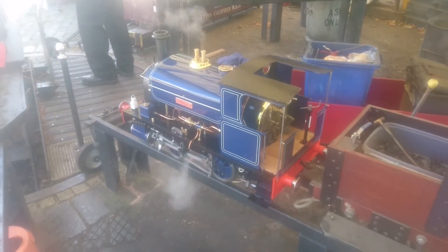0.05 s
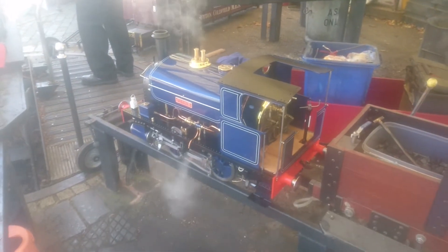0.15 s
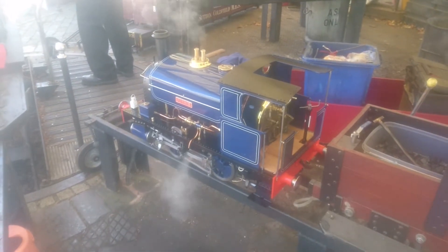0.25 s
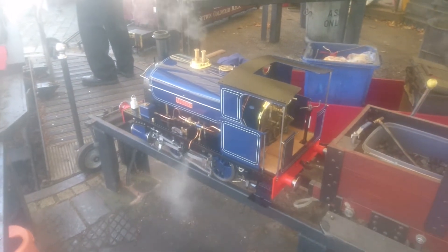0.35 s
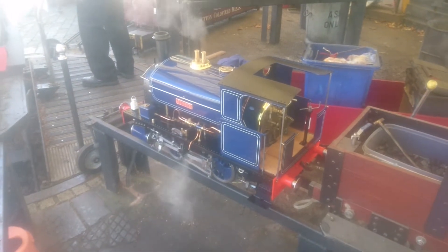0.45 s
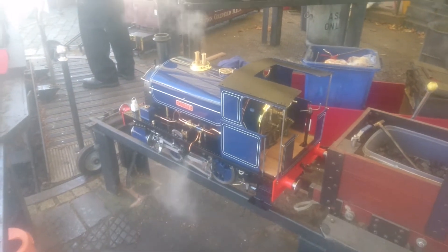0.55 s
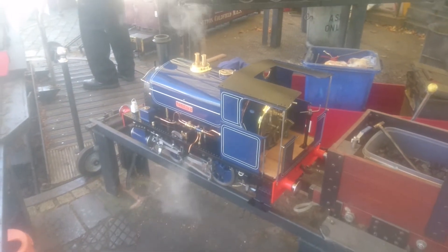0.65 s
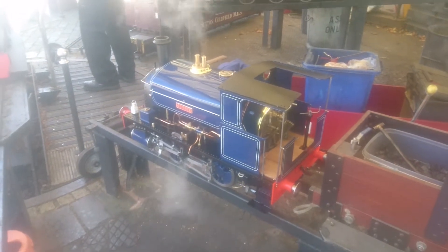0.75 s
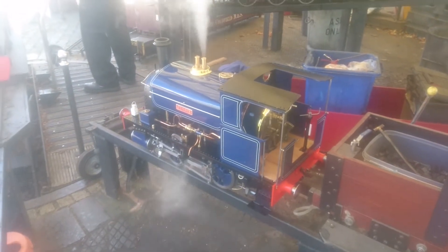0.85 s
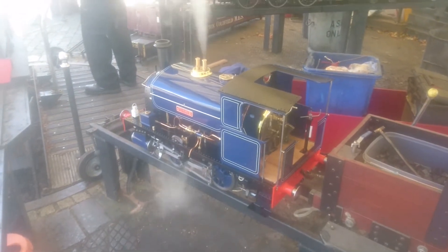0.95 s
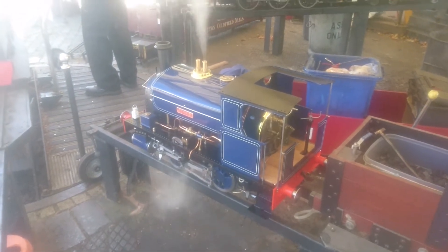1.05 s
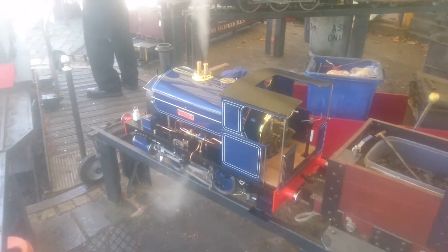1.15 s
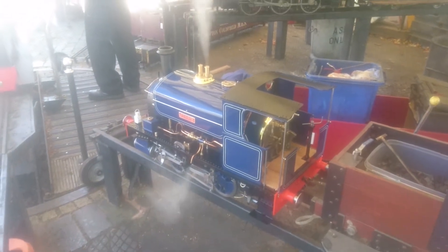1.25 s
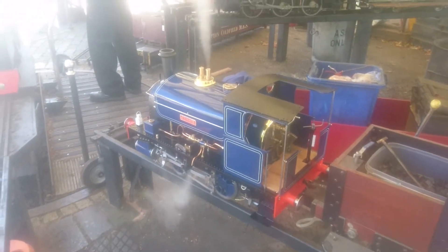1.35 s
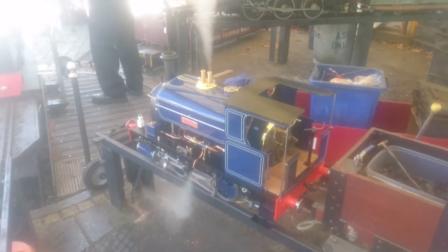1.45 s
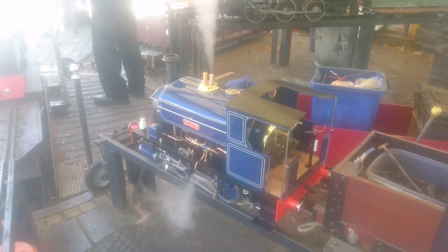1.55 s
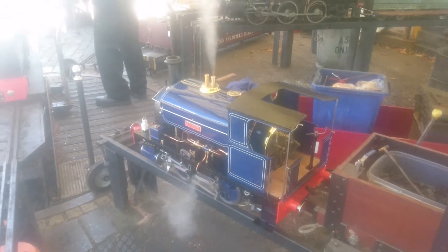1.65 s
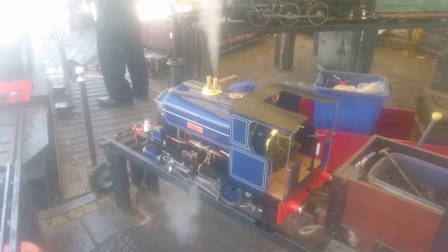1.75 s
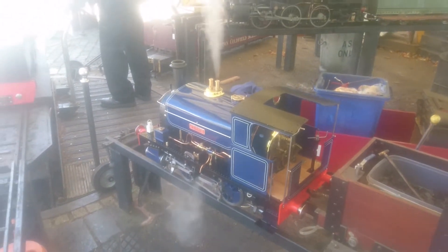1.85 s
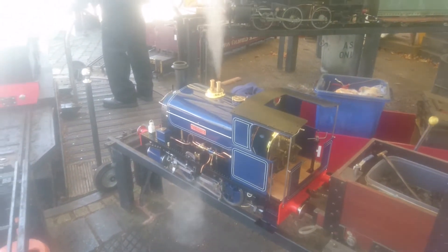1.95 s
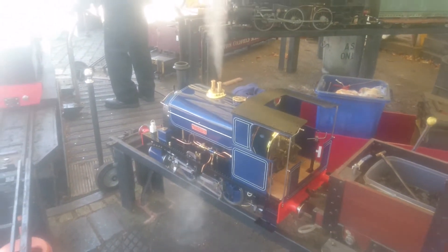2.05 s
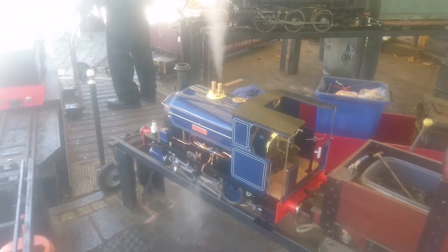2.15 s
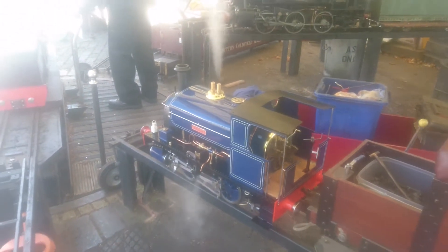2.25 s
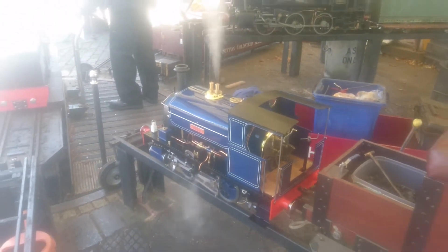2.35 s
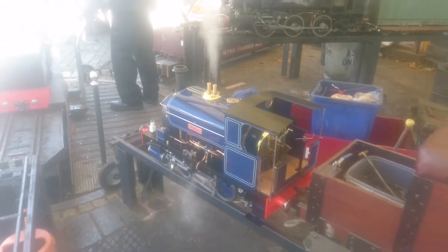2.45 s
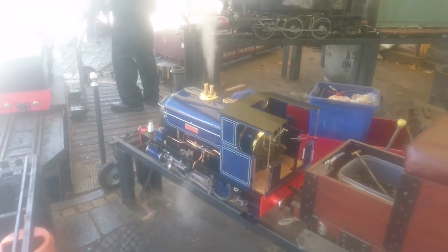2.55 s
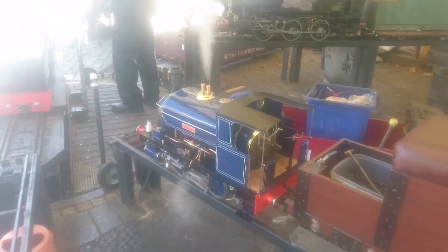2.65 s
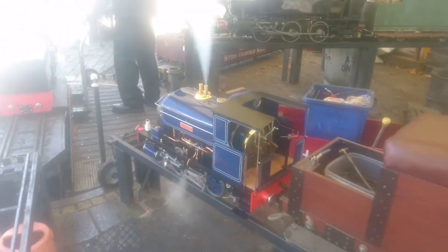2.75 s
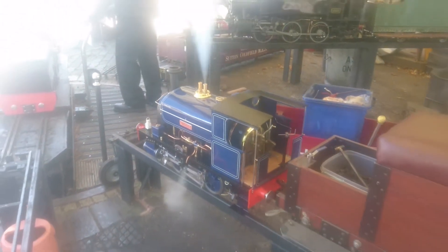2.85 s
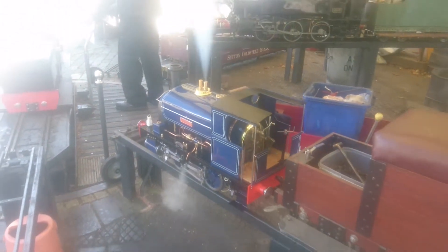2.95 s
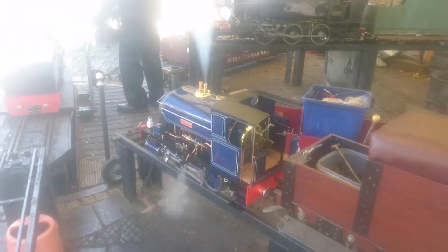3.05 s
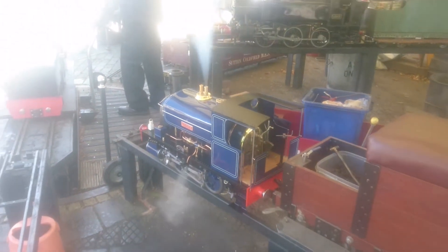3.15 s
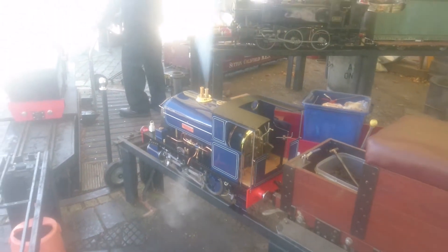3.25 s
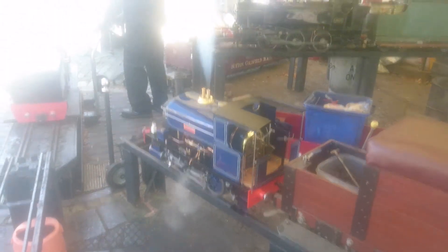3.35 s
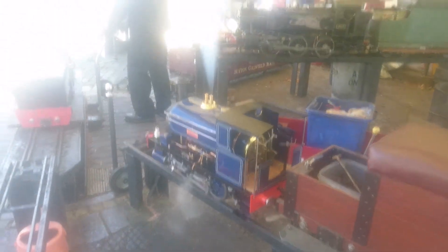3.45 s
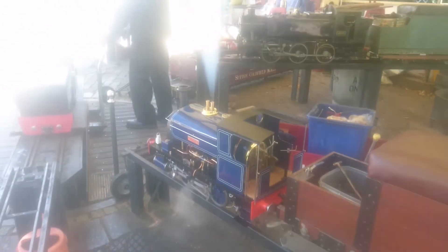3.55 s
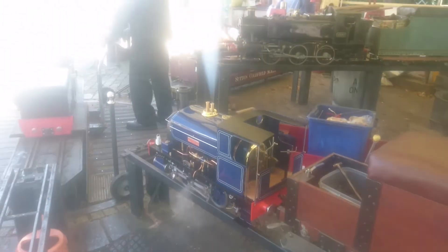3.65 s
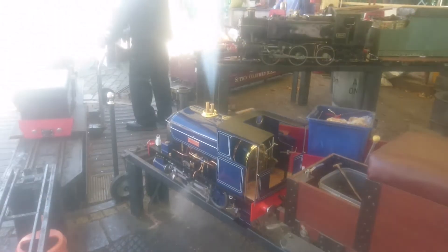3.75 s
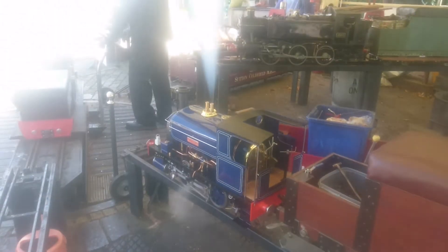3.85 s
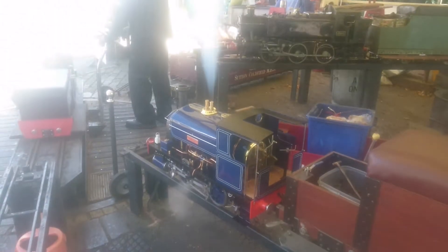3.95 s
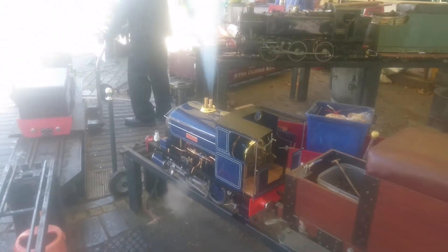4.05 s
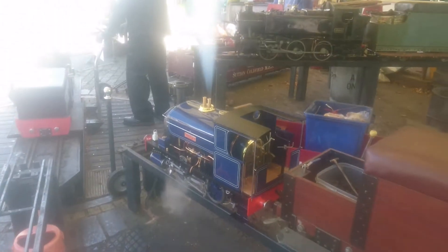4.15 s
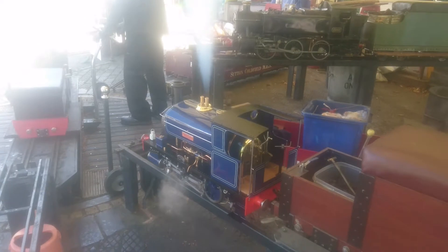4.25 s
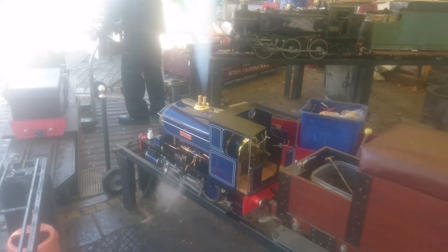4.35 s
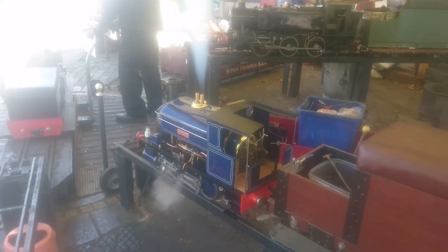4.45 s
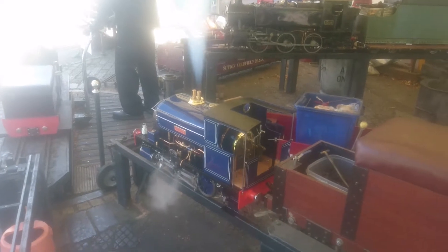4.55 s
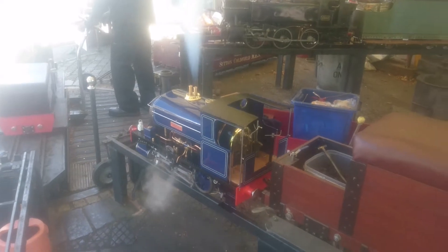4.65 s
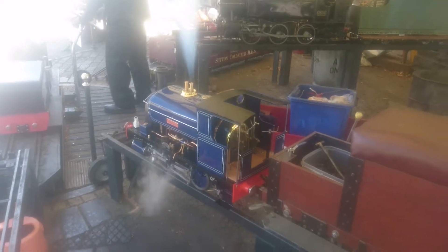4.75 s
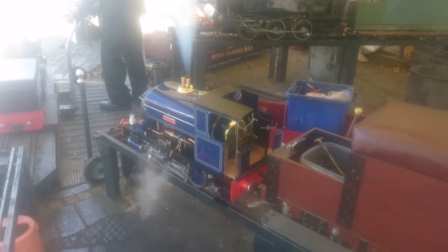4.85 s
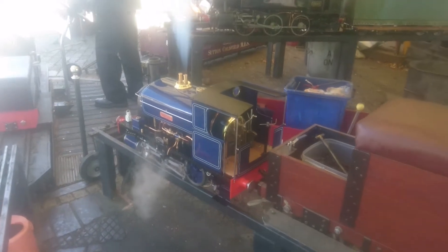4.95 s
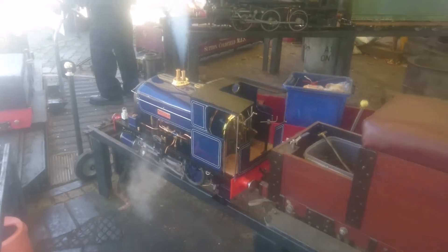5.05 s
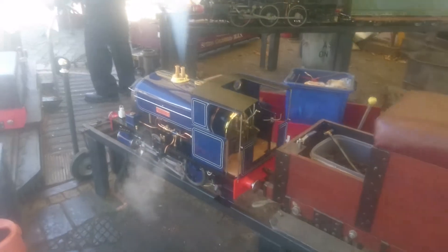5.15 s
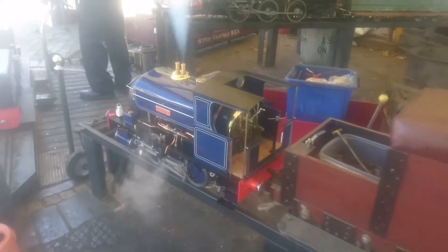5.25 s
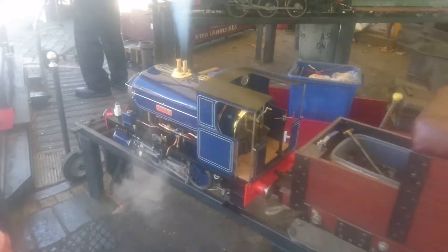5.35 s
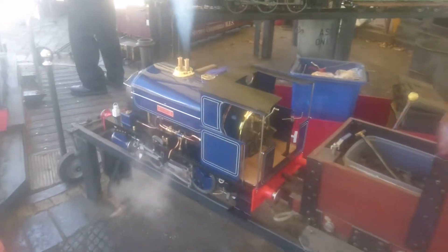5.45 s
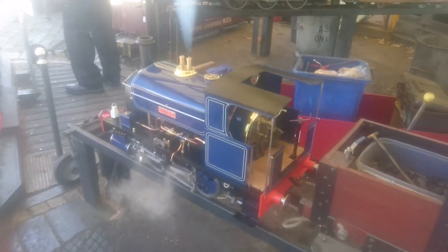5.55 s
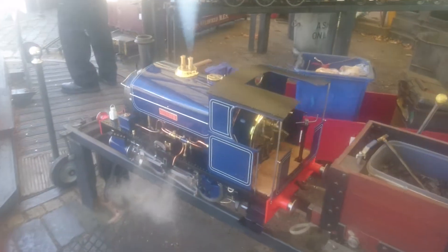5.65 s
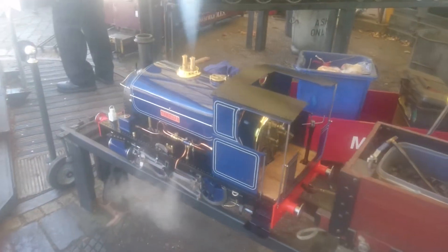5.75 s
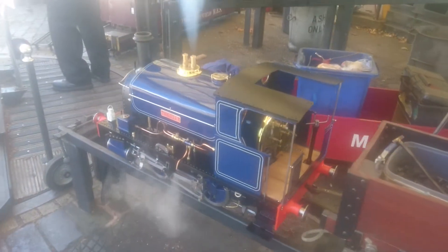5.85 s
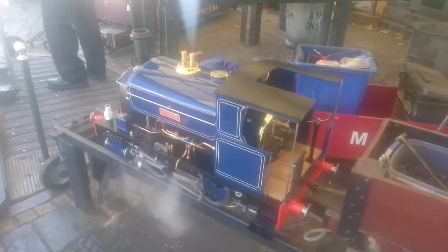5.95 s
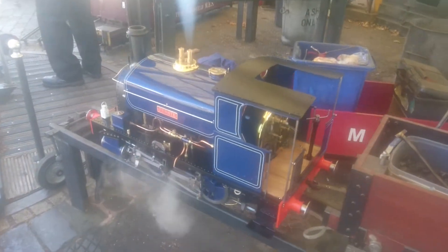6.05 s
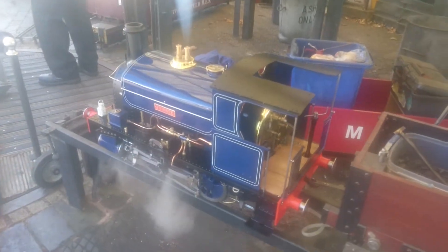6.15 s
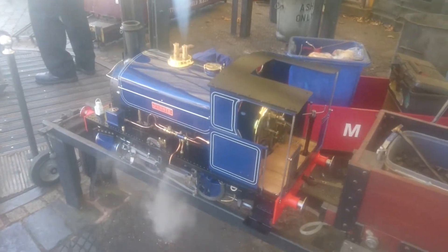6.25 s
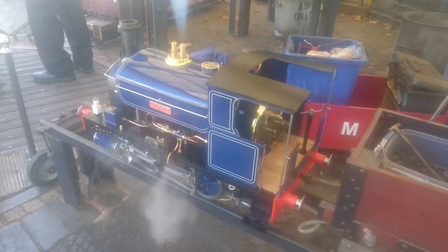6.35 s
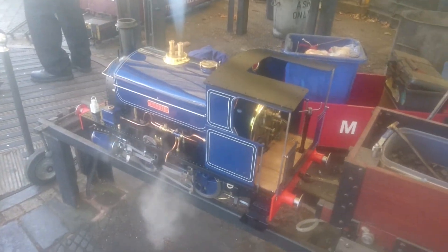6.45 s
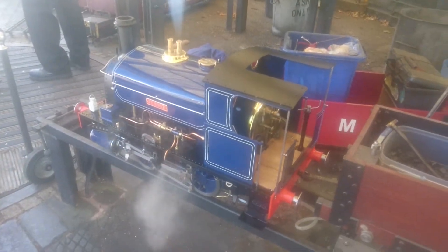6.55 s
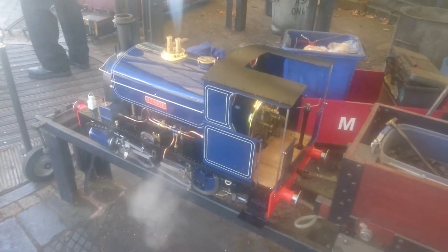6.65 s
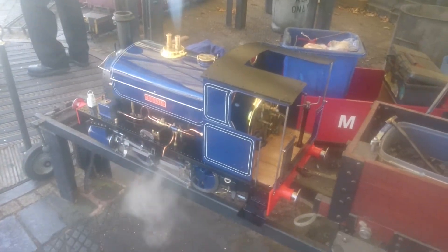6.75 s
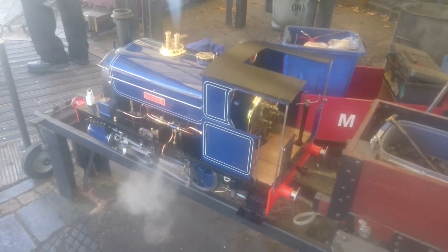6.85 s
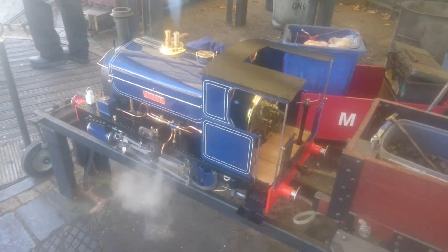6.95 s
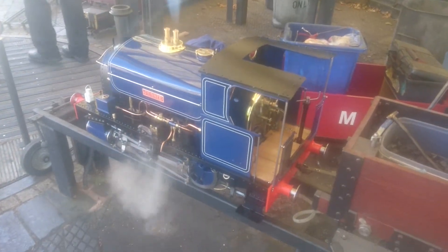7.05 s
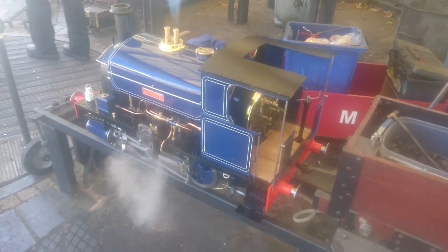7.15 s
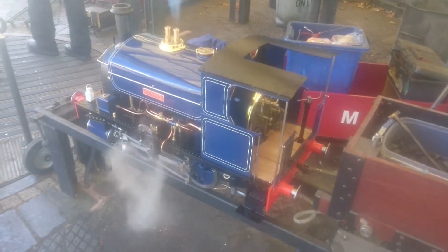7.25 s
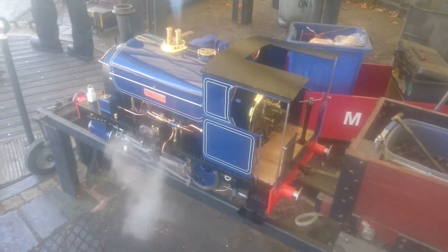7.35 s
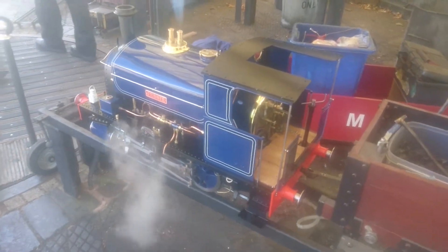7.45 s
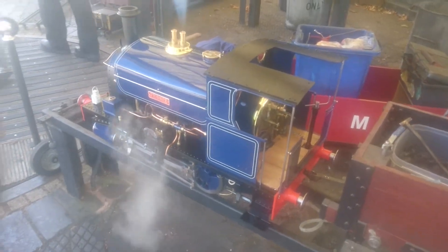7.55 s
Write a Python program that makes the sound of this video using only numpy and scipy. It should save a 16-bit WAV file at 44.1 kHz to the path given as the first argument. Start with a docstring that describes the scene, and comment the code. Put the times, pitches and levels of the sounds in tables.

```python
"""Steam hisses from a leak, a safety valve starts to simmer and then pops fully open to a roar; a small engine
idles nearby, something knocks, rattles and squeaks: a miniature steam locomotive in an open shed.
The jets are surging noise with a colour for each port, the engine is trains of pressure pulses, the knocks are
ringing modes, the squeak a gliding sine and the yard shaped noise. Two microphone ports a few centimetres apart
listen, turning a little, through gain control."""
import sys
import numpy as np
from scipy import signal
from scipy.fft import rfft, irfft, next_fast_len
from scipy.io import wavfile
from scipy.ndimage import uniform_filter1d

SR = 44100
rng = np.random.default_rng(int(sys.argv[2]) if len(sys.argv) > 2 else 0)


def log_audio(samples):
    """Write samples as a 16-bit WAV file to the path given in sys.argv[1]."""
    # one column per channel
    frames = np.atleast_2d(samples).T
    # limit to full scale, then quantise
    limited = np.clip(frames, -1, 1)
    pcm = np.round(limited * 32767).astype(np.int16)
    wavfile.write(sys.argv[1], SR, pcm)


def ratio_of_db(decibels):
    """Turn decibels (scalar or array-like) into linear amplitude factors; 0 dB maps to 1."""
    return 10 ** (np.asarray(decibels, float) / 20)


N = 334834
LIFT_S = 0.758   # the safety valve lifts off its seat


def steam():
    """Three jets sound together: the open valve, its simmer before and under that, and the leak."""
    return open_valve() + simmer() + leak()


def open_valve():
    """The valve pops open into a broadband roar; turning the ports cross-fades between two colours of it."""
    pop_s, rise_s = 2.6585, 0.0042
    # flow of the wide-open valve: t/s, level/dB
    flow_curve = [(2.66, -10), (2.85, -8), (3.2, -8.5), (4.05, -6.5), (5.0, -8), (6.5, -8.5), (7.1, -8),
                  (7.6, -9)]
    # turn of the microphone away from the valve: t/s, turn/0-1
    turn_curve = [(2.8, 0.3), (3.2, 0), (4.5, 0), (4.9, 0.43), (5.3, 0.42), (5.7, 0.89), (7.6, 1)]
    # colour with the ports facing the valve: f/Hz, left/dB per Hz, right/dB per Hz (relative)
    facing_colour = [(300, -18, -16.5), (470, -20.5, -18.5), (930, -13, -15), (2020, -8.5, -8),
                     (2980, -7.5, -5), (3940, -7.5, -1.5), (5580, 0, 0.5), (6420, -3.5, -3),
                     (7200, -8, -3.5), (8250, -14.5, -7.5), (9500, -7, -2.5), (10200, -7.5, -6.5),
                     (12500, -7.5, -2.5), (14200, -7.5, -10), (16300, -14.5, -2.5)]
    # colour with the ports turned away: f/Hz, left/dB per Hz, right/dB per Hz (relative)
    turned_colour = [(336, -22, -17), (540, -16, -14), (985, -12, -13), (2480, -12.5, -2.5),
                     (3240, -6.5, -8.5), (4100, -6, -1), (5730, 1.5, -2), (6700, -10.5, 0.5),
                     (7200, -3, -7.5), (8040, -24, -14), (9500, -7, 1.5), (11440, -12, -4),
                     (11400, -10, -10), (12800, -9, -2.5), (15500, -3, -3.5)]
    # narrow path resonances, facing: f/Hz, width/Hz, left/dB, right/dB
    facing_peaks = [(568, 43, 6.7, 3.5), (810, 34, 4.8, 9.5), (994, 56, 3.2, 8), (1118, 49, 6.2, 10),
                    (1356, 26, 2.3, 2.5), (1790, 44, 2.5, -1), (1900, 81, 1.6, 8.5), (2210, 100, 3.1, 0),
                    (2654, 86, 3, 5), (3370, 140, 0.83, 3), (4280, 170, 2.6, -4.5)]
    # narrow path resonances, turned away: f/Hz, width/Hz, left/dB, right/dB
    turned_peaks = [(875, 32, 5.5, 9.5), (1086, 19, -5, 12.5), (1180, 50, 4, -2.5), (1340, 70, -2, 4.5),
                    (1488, 65, 11.5, -4.5), (2130, 130, 4.5, 5), (2323, 110, 13, 4), (2640, 94, -9, 5.5),
                    (3670, 190, -2, -10), (4290, 250, -1, 3.5)]

    flow = ratio_of_db(in_time(flow_curve)[0]) * (1 - np.exp(-since(pop_s) / rise_s))
    turn = np.clip(in_time(turn_curve)[0], 0, 1)
    facing = flow * np.sqrt(1 - turn) * turbulence(surge_db=0.5, patchy_db=0.5)
    turned = flow * np.sqrt(turn) * turbulence(surge_db=0.5, patchy_db=0.88)
    facing_ports = at_ports(facing, facing_colour, facing_peaks, lag_s=0.00008)
    turned_ports = at_ports(turned, turned_colour, turned_peaks, lag_s=0.00009)
    return facing_ports + turned_ports


def simmer():
    """The valve lifts with a short spit of steam, then lets a thin, slowly growing jet through."""
    spit_db, spit_decay_s = -26, 0.03
    level_db, growth_db_per_s, rise_s = -28, 0.9, 0.09
    # colour of the jet: f/Hz, left/dB per Hz, right/dB per Hz (relative)
    colour = [(500, -17, -23), (1490, -25, -14), (2800, -6.5, -9), (3570, -42, -47), (4600, -3.5, -9.5),
              (5560, -11, 2), (5850, 4, -1.5), (7200, -9.5, -4), (8260, -19, -10.5), (9700, -12, -5.5),
              (11000, -24, -11), (13000, -15, -11), (14500, -11, -9), (15600, -18, -10)]
    # narrow path resonances: f/Hz, width/Hz, left/dB, right/dB
    peaks = [(1270, 80, 13, 2.4), (1600, 260, 13, 6), (2660, 360, 0, 3), (4150, 400, -4, 2),
             (5250, 200, 0, 1.6)]

    t = since(LIFT_S)
    spit = ratio_of_db(spit_db) * (t > 0) * np.exp(-t / spit_decay_s)
    steady = ratio_of_db(level_db + growth_db_per_s * t) * (1 - np.exp(-t / rise_s))
    jet = (spit + steady) * turbulence(surge_db=0.2, patchy_db=1.2)
    return at_ports(jet, colour, peaks, lag_s=0.000234)


def leak():
    """Steam leaks under the frames, creeping up, and weakens once the valve lets steam out."""
    level_db, growth_db_per_s = -29, 0.26
    eases_db, eases_s = 1.5, 0.4   # depth and time constant of the weakening
    # colour of the jet: f/Hz, left/dB per Hz, right/dB per Hz (relative)
    colour = [(500, -10, -11), (1040, -13, -10.5), (1710, -14.5, -8), (2200, -6, -2), (2720, -5, -4.5),
              (4300, -7, 1), (4970, -22, 1.5), (5210, 2.5, -1.5), (6240, -11, -5), (6330, -9, -2.5),
              (7900, -19.5, -17.5), (9430, -9.5, -1), (11200, -7.5, -16.5), (12400, -11, -5.5),
              (14000, -19, -20), (15500, -19, -16)]
    # narrow path resonances: f/Hz, width/Hz, left/dB, right/dB
    peaks = [(1670, 110, 17.5, 7.5), (2600, 120, 5.5, 6.5), (3120, 240, -7, 3), (4050, 240, 7.5, 5.5),
             (4860, 150, -2, -6), (5180, 150, 10.5, 5), (6450, 300, 3, 2), (7350, 250, 11, 2),
             (8470, 250, 14.5, 5), (9780, 200, 7, 8), (10500, 200, -5, 8)]

    easing_db = eases_db * (1 - np.exp(-since(LIFT_S) / eases_s))
    gain = ratio_of_db(level_db + growth_db_per_s * since(0) - easing_db)
    jet = gain * turbulence(surge_db=1.04, patchy_db=0.36)
    return at_ports(jet, colour, peaks, lag_s=0.000257)


def turbulence(surge_db, patchy_db):
    """White jet noise that surges as a whole and flickers band by band."""
    size = next_fast_len(N)
    white = rfft(rng.standard_normal(size))
    hz = np.linspace(0, SR / 2, size // 2 + 1)
    edges_hz = [0, 700, 1400, 2800, 4500, 7000, 10500, SR]
    patchy = np.zeros(N)
    for low, high in zip(edges_hz, edges_hz[1:]):
        band = irfft(white * (hz >= low) * (hz < high), size)[:N]
        patchy += band * ratio_of_db(patchy_db * drift(8.2))
    surge = ratio_of_db(surge_db * (0.38 * drift(3.2) + drift(11.5)))
    return rms_one(patchy * surge)


def at_ports(x, colour, peaks, lag_s):
    """The straight sound reaches the right port later; each port adds echoes, scattered sound and its colour."""
    scattered_share = 0.32   # part of the indirect power that is unrelated at the two ports
    # power straight from the jet, the rest comes off frames, floor and walls: f/Hz, share/0-1
    direct = [(300, 0.72), (800, 0.93), (1500, 0.7), (3000, 0.37), (8000, 0.06), (15000, 0.27)]

    size = next_fast_len(N + 4096)
    hz = np.linspace(0, SR / 2, size // 2 + 1)
    lift_db = np.zeros((2, len(hz)))
    for top_hz, width_hz, left_db, right_db in peaks:
        lift_db += np.array([[left_db], [right_db]]) / (1 + (2 * (hz - top_hz) / width_hz) ** 2)
    gain = ratio_of_db(at_hz(colour, hz) + lift_db) * hz / (hz + 150) * (hz < 16000)
    gain = gain / np.sqrt(np.mean(gain ** 2))

    straight = rfft(x, size) * np.exp(-2j * np.pi * hz * np.array([[0], [lag_s]]))
    scattered = x * rng.choice([-1, 1], (2, N))   # same swell, unrelated noise
    indirect = np.sqrt(1 - scattered_share) * echoes(x) + np.sqrt(scattered_share) * scattered
    share = np.clip(at_hz(direct, hz), 0, 1)
    mix = np.sqrt(share) * straight + np.sqrt(1 - share) * rfft(indirect, size)
    return irfft(gain * mix, size)[:, :N]


def echoes(x):
    """Dense short echoes, other ones at each port; the hand moves, so one set keeps fading into a new one."""
    t60_s, set_lasts_s = 0.12, 0.5
    hop = int(set_lasts_s * SR)
    t = np.arange(SR // 5) / SR
    padded = np.pad(x, (hop, 2 * hop))
    out = np.zeros((2, N + 3 * hop + len(t)))
    fade = np.sin(np.pi * np.arange(2 * hop) / (2 * hop))
    for i in range(0, N + hop, hop):
        paths = rng.standard_normal((2, len(t))) * ratio_of_db(-60 * t / t60_s) * (t > 0.0005)
        paths = paths / np.sqrt(np.sum(paths ** 2, axis=1, keepdims=True))
        piece = signal.fftconvolve((padded[i:i + 2 * hop] * fade)[None], paths, axes=1)
        out[:, i:i + piece.shape[1]] += piece
    return out[:, hop:hop + N]


def engine():
    """A few close pressure swings in every working cycle, each a little different; the pipe rings on."""
    first_beat_s, slow_per_s, fast_per_s, speeds_up_at = 0.023, 18.51, 18.855, 48   # cycles per s, beat number
    early_beat, early_s = 80, 0.022   # this beat and all after it come early by so much
    beat_spread_db, wavers_db = 0.7, 0.6   # cycle by cycle; slow swell and ebb
    pulse_width_s = 0.0019
    pipe_hz, pipe_width_hz, pipe_db = 114, 30, -4.5
    # pressure swings of one cycle: t from the middle of the beat/s, relative level/dB
    cycle = [(-.026, -26), (-.0165, -9), (-.007, 6), (.0023, 3.5)]
    # engine level going into the gain control: t/s, level/dB
    level_curve = [(0, -36), (2.6, -37.5), (3, -39.5), (3.9, -35), (4.7, -35), (5.6, -37.5), (6.0, -36.5),
                   (6.7, -40), (7.6, -37.5)]

    n = np.arange(144)
    slow_s = np.minimum(n, speeds_up_at) / slow_per_s
    fast_s = np.maximum(n - speeds_up_at, 0) / fast_per_s
    chance = rng.standard_normal((len(n), 2 + 2 * len(cycle)))
    beats_s = first_beat_s + slow_s + fast_s - early_s * (n >= early_beat) + 0.00074 * chance[:, 0]
    pulses = np.zeros(N + 1)   # the spare last sample takes beats past the end
    for k, (after_s, level_db) in enumerate(cycle):
        pulse_s = beats_s + after_s + 0.00026 * chance[:, 1 + 2 * k]
        at = np.clip(pulse_s * SR, 0, N).astype(int)
        pulses[at] += ratio_of_db(level_db + 0.74 * chance[:, 2 + 2 * k] + beat_spread_db * chance[:, -1])

    t = np.arange(-400, 401) / SR / pulse_width_s
    suction_then_push = t * np.exp(-t * t / 2)
    swings = rms_one(signal.fftconvolve(pulses[:N], suction_then_push, "same"))
    pipe = swings + ratio_of_db(pipe_db) * resonance(swings, pipe_hz, pipe_width_hz)
    pipe = signal.sosfilt(signal.butter(3, 66, "high", fs=SR, output="sos"), pipe)
    return ratio_of_db(in_time(level_curve)[0] + wavers_db * drift(1.6)) * rms_one(pipe)


def knocks():
    """Single knocks and a quick rattle strike the modes of one body, each contact with its own brightness."""
    rattle_s, gap_s, touches = 5.813, 0.0045, 8   # start, mean gap, number of touches
    rattle_db, rattle_tilt_db = -27, 3
    low_hz = 90   # the knocks have little sound below this
    # single knocks: t/s, blow/dB, brightness about 400 Hz/dB per octave
    blows = [(2.66, -36, -6), (4.288, -40, -4), (5.839, -17.5, -6.5), (5.857, -24, -4)]
    # modes of the struck body: f/Hz, level/dB, t60/s
    modes = [(105, -18, 0.3), (190, -3, 0.05), (314, 2.5, 0.05), (505, -0.5, 0.045), (715, -1.5, 0.043),
             (990, 6.5, 0.027), (1220, -2, .05), (1550, -5, .04), (1880, 0, .04), (2100, 1, 0.035),
             (2740, -16, .03)]

    rattle = []
    for k, (late, bright) in enumerate(rng.uniform(-1, 1, (touches, 2))):
        rattle.append((rattle_s + gap_s * (k + 0.4 * late), rattle_db, rattle_tilt_db + 1.9 * bright))
    s, blow_db, tilt_db = np.transpose(blows + rattle)
    out = np.zeros(N)
    for hz, level_db, t60_s in modes:
        uneven_db = rng.standard_normal(len(s))   # each contact excites the mode differently
        clicks = np.zeros(N)
        clicks[(s * SR).astype(int)] = -ratio_of_db(blow_db + level_db + tilt_db * np.log2(hz / 400) + uneven_db)
        r = ratio_of_db(-60 / (t60_s * SR))
        w = 2 * np.pi * hz / SR
        out += signal.lfilter([0, np.sin(w)], [1, -2 * r * np.cos(w), r * r], clicks + 1e-18)
    return signal.sosfilt(signal.butter(2, low_hz, "high", fs=SR, output="sos"), out)


def squeak():
    """A short hollow squeak: a sine that glides up a little, flickers, swells and goes."""
    # pitch and level: t/s, f/Hz, level/dB
    glide = [(5.535, 595, -33), (5.575, 615, -29), (5.595, 630, -25.5), (5.632, 630, -31)]
    hz, level_db = in_time(glide)
    n = np.arange(N)
    sounding = (n > glide[0][0] * SR) & (n < glide[-1][0] * SR)
    return sounding * ratio_of_db(level_db + 1.5 * drift(40.0)) * np.sin(2 * np.pi * np.cumsum(hz) / SR)


def rumble():
    """Low background of the yard: shaped noise, nearly alike at both ports."""
    # colour: f/Hz, relative level/dB per Hz
    colour = [(25, -42), (42, -38), (60, 3), (100, -19), (200, 4), (350, -3), (600, -12), (1000, -13.5)]
    size = next_fast_len(N)
    shape = ratio_of_db(at_hz(colour, np.linspace(0, SR / 2, size // 2 + 1)))
    mid, side = irfft(rfft(rng.standard_normal((2, size))) * shape, size)[:, :N]
    return ratio_of_db(-39) * rms_one(mid + 0.13 * side * np.array([[1], [-1]]))


def rms_one(x):
    """Scale to rms 1."""
    return x / np.sqrt(np.mean(x ** 2) + 1e-20)


def since(s):
    """Seconds gone by after a moment, 0 before it."""
    return np.maximum(np.arange(N) / SR - s, 0)


def in_time(rows):
    """Columns of a curve over time, sample by sample."""
    s, *columns = np.transpose(rows)
    return [np.interp(np.arange(N) / SR, s, column) for column in columns]


def at_hz(rows, hz):
    """Columns of a spectrum at the given frequencies, joined along log frequency."""
    known_hz, *columns = np.transpose(rows)
    return np.array([np.interp(np.log(hz + 1), np.log(known_hz), column) for column in columns])


def drift(corner_hz):
    """Slow random wander of rms 1: noise through two equal low-pass poles."""
    step = 40   # samples between computed points
    r = np.exp(-2 * np.pi * corner_hz * step / SR)
    noise = rng.standard_normal(N // step + 2002)
    slow = signal.lfilter([1], [1, -2 * r, r * r], noise)[2000:]   # skips the filter's start
    return np.interp(np.arange(N) / step, np.arange(len(slow)), rms_one(slow))


def resonance(x, hz, width_hz):
    """Two-pole resonance, gain 1 on top."""
    r = np.exp(-np.pi * width_hz / SR)
    zeros = [(1 - r * r) / 2, 0, (r * r - 1) / 2]
    poles = [1, -2 * r * np.cos(2 * np.pi * hz / SR), r * r]
    return signal.lfilter(zeros, poles, x + 1e-18)


def scene():
    """Engine and yard are stronger at the right port, knocks and squeak too; knocks echo through the shed."""
    struck = knocks()
    small = (struck + squeak()) * ratio_of_db([[-1.1], [1.1]]) + ratio_of_db(-5) * echoes(struck)
    low = (engine() + rumble()) * ratio_of_db([[-1.8], [1.6]])
    return steam() + low + small


def low_pass(x):
    """Removes everything above the highest recorded frequency."""
    return signal.sosfilt(signal.butter(12, 16600, fs=SR, output="sos"), x)


def record(dry):
    """Gain control turns loud passages down, top and bottom are cut and peaks are clipped."""
    knee_db, squeeze = -20.5, 0.41   # dB taken off per dB above the knee
    attack_s, release_s = 0.002, 0.39   # the held level falls 10 dB per release time
    power = uniform_filter1d(np.mean(dry ** 2, axis=0), size=2048, origin=1023)   # over the past 46 ms
    level_db = 10 * np.log10(power + 1e-12)
    fall_db = np.arange(N) / SR / release_s * 10
    held_db = np.maximum.accumulate(level_db + fall_db) - fall_db
    r = np.exp(-1 / (attack_s * SR))
    gain_db = signal.lfilter([1 - r], [1, -r], -squeeze * np.maximum(held_db - knee_db, 0))
    heard = signal.sosfilt(signal.cheby2(22, 60, 16050, fs=SR, output="sos"), dry * ratio_of_db(gain_db))
    heard = signal.sosfilt(signal.butter(2, 44.7, "high", fs=SR, output="sos"), heard)   # microphone's low end
    return low_pass(np.clip(heard, -1, 1))


dry = scene()
out = record(dry)
log_audio(out)
```